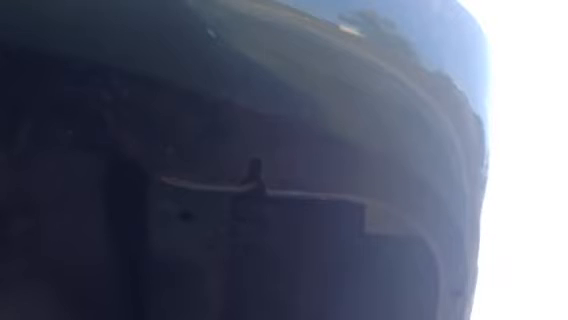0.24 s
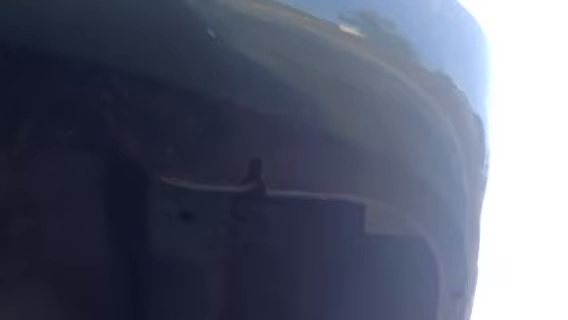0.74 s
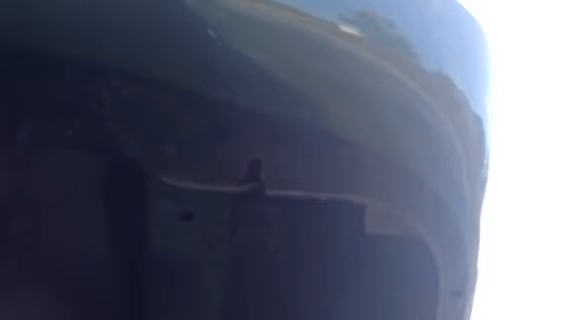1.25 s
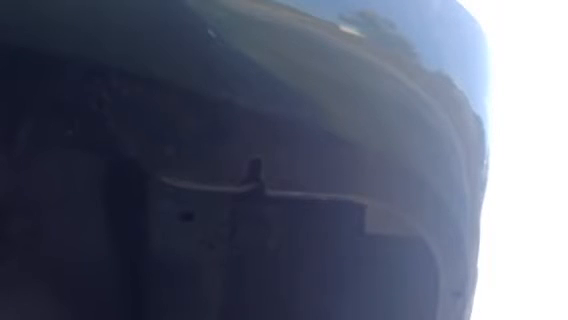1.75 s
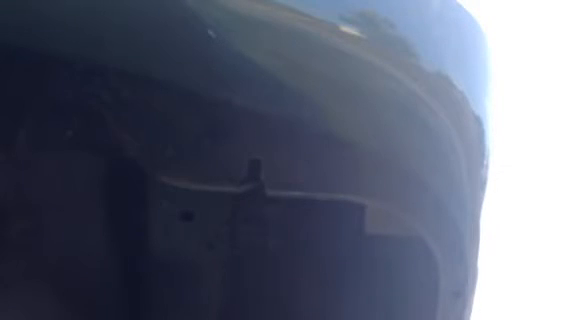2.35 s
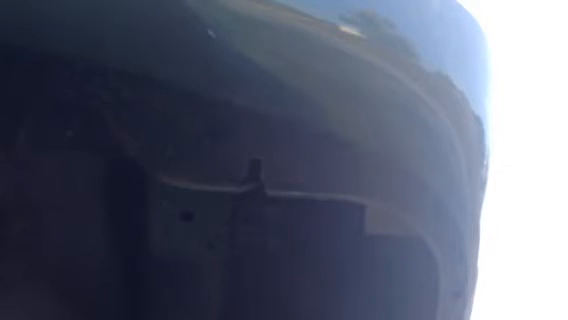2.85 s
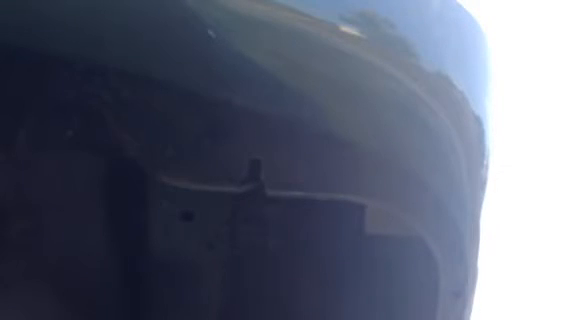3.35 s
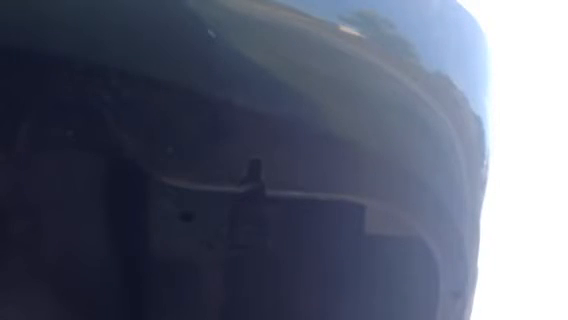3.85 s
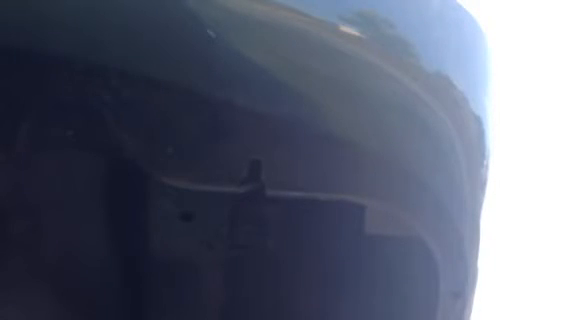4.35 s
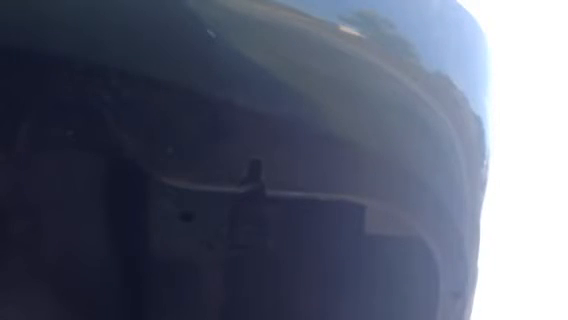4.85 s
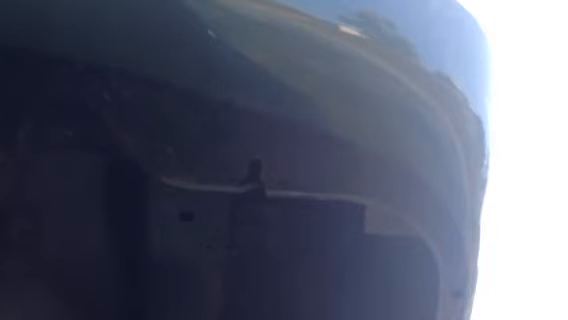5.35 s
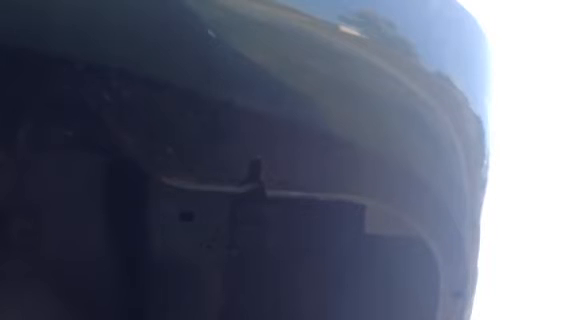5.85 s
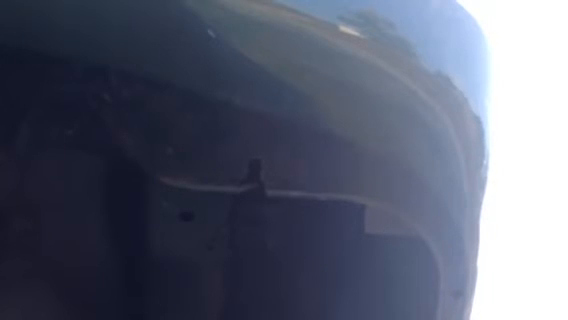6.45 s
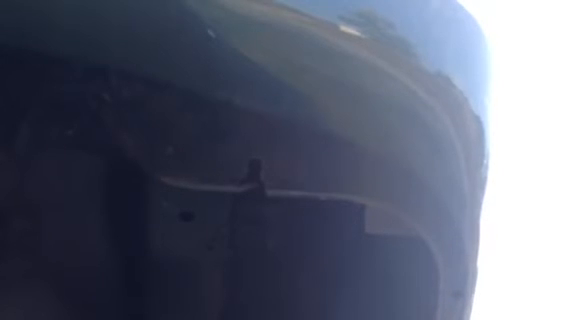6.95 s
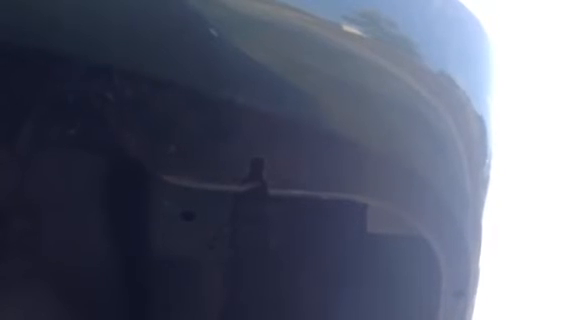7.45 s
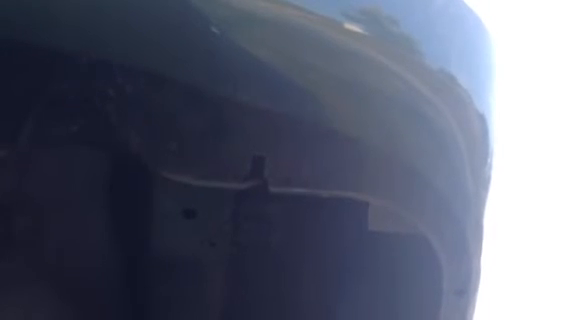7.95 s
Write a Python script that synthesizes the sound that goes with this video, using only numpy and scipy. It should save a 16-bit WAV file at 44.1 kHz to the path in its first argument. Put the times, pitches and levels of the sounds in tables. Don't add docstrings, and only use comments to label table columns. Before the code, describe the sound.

Close, dry and mono, outdoors at the tailpipe of a four-cylinder car without a muffler. At 0 s the engine is already running at about 45 firings per second, dropping by 1.1 s to a quieter, lumpy 26-per-second idle with metallic valve clatter. At 1.8 s the throttle snaps open: a rapid string of harsh cracks, then a raspy roar peaking near 2.2 s at about 79. It falls with deep bangs around 2.3-2.9 s, burbling down to idle by 3.7 s. At 3.9 s a second, louder rev crackles up to about 100 by 4.35 s, then descends as a hollow drone with pops near 4.7 s. It slows through 6 s, sputters at 6.45 s, and from 6.8 s dies in separate slowing chugs and bared clatter until about 7.3 s. Small metal ticks and one last knock near 7.9 s follow, over faint rumble and a high throbbing insect.

```python
import sys
import numpy as np
from scipy import signal
from scipy.fft import rfft, irfft, next_fast_len
from scipy.io import wavfile
from scipy.ndimage import uniform_filter1d

SR = 44100
rng = np.random.default_rng(int(sys.argv[2]) if len(sys.argv) > 2 else 0)


def attenuation_scalar(level_db):
    decades = np.asarray(level_db, float) / 20
    return 10 ** decades


def waveform_to_disk(signal):
    frames = np.transpose(np.atleast_2d(signal))
    scaled = np.clip(frames, -1, 1) * 32767
    samples = np.round(scaled).astype(np.int16)
    wavfile.write(sys.argv[1], SR, samples)


N = 361179
TIME = np.arange(N) / SR
SIZE = next_fast_len(N)
FIRST_PHASE, STALL_S = .298, 6.79

# [f/Hz, level/dB per Hz]
YARD_SPECTRUM = [(20, -30), (57, -5.5), (88, 4), (170, -2.5), (287, -14), (453, -14.5), (961, -24.5),
                 (3130, -31.5), (7000, -29), (15300, -37.5)]
# [f/Hz, width/Hz, level/dB]
PANEL_RINGS = [(2380, 45, -70), (4040, 40, -72), (3560, 120, -76)]
# [t/s, level/dB, f/Hz]
COOLING_TICKS = [(7.3194, -38, 1530), (7.3482, -38.5, 1080), (7.376, -41.5, 4400), (7.4987, -44, 1210),
                 (7.5744, -41, 1850), (7.645, -46, 2340), (7.7894, -53, 1341), (7.8294, -50, 3880),
                 (7.862, -47.5, 4060), (7.888, -54, 2080), (8.055, -46, 1320)]
# [f/Hz, level/dB per Hz]
CLATTER_SPECTRUM = [(260, -9.5), (450, -3.5), (529, -26), (732, -11), (899, -21), (1070, -12.5),
                    (1460, -10.5), (1600, -13), (2110, -12.5), (3010, -16), (5670, -21), (6580, -25.5),
                    (8080, -28.5), (15200, -45)]
# [f/Hz, width/Hz, level/dB]
COVER_MODES = [(760, 32, 3), (900, 31, 3.5), (1349, 7.8, 4.5), (1580, 41, 2), (2100, 12, 1),
               (2780, 14, 3.5), (3190, 14, -3)]
# [f/Hz, width/Hz, level/dB, place in the cycle 0-1]
TAPPETS = [(5740, 36, -69.5, 0), (2755, 23, -67, 0.2), (3100, 37, -69.5, 0.4), (1510, 100, -83, 1)]
# [t/s, level/dB]
RUN_DOWN_LEVEL = [
    (6.7, 0),
    (7.0, 9.5),
    (7.12, 0.5),
    (7.5, -10),
    (7.7, -20),
    (7.88, -8),
    (7.92, -44),
]
# [t/s, depth/dB, recovery/s]
GAIN_DIPS = [
    (2.08, -7.5, 0.34),
    (2.52, -5.5, 0.89),
    (4.3, -4.5, 0.37),
    (4.76, -3.5, 0.31),
]
# [t/s, firings per s]
CRANK_SPEED = [(0, 45.29), (.302, 41.24), (1.149, 26.39), (1.746, 26.52), (1.845, 32.28), (2.174, 79.2),
               (2.484, 66.87), (2.786, 57.86), (3.095, 45.29), (3.705, 30.18), (3.9, 27.28), (4.043, 42.54),
               (4.348, 99.77), (4.723, 88.32), (5.138, 70.71), (5.932, 40.31), (6.364, 37.58), (7.0, 18.63)]
# [pedal down t/s, pedal up t/s, pipe starts to cool t/s, pipe cool t/s]
THROTTLE_STABS = [
    (1.759, 2.021, 2.17, 2.3),
    (3.885, 4.232, 4.33, 4.42),
]
# [t/s, share of full throttle]
IDLE_AIR = [
    (0, 0.091),
    (.8, 0.02),
    (5.9, 0.011),
    (6.4, 0.15),
    (6.8, 0.39),
]
# [start t/s, end t/s, extra unevenness/dB]
ROUGH_SPELLS = [
    (2.22, 2.55, 2.6),
    (2.78, 2.9, 2.3),
    (4.45, 4.76, .9),
]
# [t/s, level/dB]
TAILPIPE_LEVEL = [(0, -15.5), (.52, -17), (.95, -23), (1.76, -24), (1.795, -11.5), (2.44, -9.5),
                  (2.7, -16.5), (3.11, -13), (3.48, -20), (3.89, -18.5), (3.925, -11), (4.7, -7),
                  (5.3, -11), (5.92, -10.5), (6.35, -16), (6.58, -12), (7.08, -19.5), (7.45, -46)]
# [t/s, change/dB, fall/s, recovery/s]
NOTE_DIPS = [
    (1.791, 6, .02, 0.04),
    (2.21, -4, .15, 0.2),
    (2.51, -10.5, 0.04, 0.098),
    (2.86, -5, 0.071, 0.19),
    (4.41, -9, 0.1, 0.076),
    (5.45, -3, 0.23, 0.41),
    (5.98, -1, .03, 0.12),
    (6.78, -5.5, .1, 0.02),
    (7.16, -8.5, 0.058, 0.072),
]
# [t/s, crack/dB, brightness/dB, thump/dB]
BANGS = [(1.82, -19, -15.5, -34), (1.849, -13, -8, -39), (1.879, -17, -9.5, -20), (1.904, -16, -11.5, -19),
         (1.928, -27, -16, -29), (1.949, -18.5, -6, -14.5), (1.971, -16, -11, -36),
         (2.127, -25.5, -11, -27), (2.178, -28, -17, -26), (2.314, -18, -11.5, -14),
         (2.335, -19, -15.5, -4.5), (2.473, -18, -17, 2), (2.776, -27, -24.5, 1), (2.798, -38, -9, -14),
         (2.84, -42, -16, -3), (2.92, -38.5, -11.5, -18), (3.932, -20, -13.5, -20), (3.959, -12, -8, -12),
         (3.988, -13, -10.5, -19), (4.011, -16.5, -7.5, -22), (4.037, -23, -7, -36),
         (4.059, -18.5, -6.5, -15), (4.081, -25, -4, -17), (4.102, -18.5, -11, -29),
         (4.686, -23.5, -22, -10), (4.721, -21, -22, -19.5), (6.445, -31.5, -5, -18),
         (6.474, -32.5, -1.5, -14), (6.531, -39, 0, -33)]
# [t/s, crack/dB, brightness/dB, thump/dB]
LAST_STROKES = [(6.811, -22, -10, -0.75), (6.852, -20.5, -10.5, -0.83), (6.895, -13.5, -12, -1.2),
                (6.943, -20.5, -7, -1.5), (6.991, -13, -11.5, -1.3), (7.042, -15.5, -10, -3.4),
                (7.1, -20, -9, -1.3), (7.133, -51, 0, -0.7), (7.171, -35, -15, -1.8),
                (7.213, -57, -9, -0.43), (7.322, -54, -1, -2.6)]
# [f/Hz, level/dB per Hz]
RASP_SPECTRUM = [(250, -22.5), (430, -0.5), (487, 1), (570, -5.5), (772, 0.5), (857, -7), (1050, -9),
                 (1500, -19), (1950, -45.5), (3300, -120)]
# [f/Hz, level/dB per Hz]
CRACKLE_SPECTRUM = [(650, -29.5), (1100, -2), (1430, -7), (1620, -1.5), (1760, -7), (2040, -1.5),
                    (2200, -6), (2830, -8), (4070, -19), (5720, -19.5), (13900, -35.5), (15200, -41)]
# [f/Hz, width/Hz, level/dB]
BODY_MODES = [(63.6, 12.8, -3.5), (255.3, 12, -19), (339.6, 29, -26.5)]


def unit(x):
    return x / np.sqrt(np.mean(x ** 2))


def columns(table):
    s, *rest = np.transpose(table)
    return [np.interp(TIME, s, c) for c in rest]


def excursion(s, fall_s, change_db, back_s):
    return np.interp(TIME, [s - fall_s, s, s + back_s], [0, change_db, 0])


def ring(x, hz, width):
    return signal.lfilter(*signal.iirpeak(hz, hz / width, fs=SR), x)


def hiss(spectrum):
    hz, db = np.transpose(spectrum)
    f = np.arange(SIZE // 2 + 1) * SR / SIZE + 1
    gain = attenuation_scalar(np.interp(np.log(f), np.log(hz), db, -90, -90))
    return unit(irfft(rfft(rng.standard_normal(SIZE)) * gain, SIZE)[:N])


def clicks(s, size):
    return np.bincount(np.clip((np.asarray(s) * SR).astype(int), 0, N - 1), size, N)


def burst(x, ms):
    return uniform_filter1d(signal.lfilter([1], [1, -np.exp(-1000 / (ms * SR))], x), size=170)


def steady(x, s=0.038):
    k = int(s * SR)
    return x / np.sqrt(uniform_filter1d(uniform_filter1d(x ** 2, k), k) + 1e-12)


def walk(rate):
    k = int(SR / rate)
    return 1.3 * uniform_filter1d(np.repeat(rng.standard_normal(N // k + 1), k), k)[:N]


def firing_rate(turn):
    return np.gradient(turn) * SR


def pedal():
    press_s, gas_dies_db_per_s = .035, 218
    heat = sum(np.interp(TIME, [down, down + press_s, cooling, cool], [0, 1, 1, 0])
               for down, up, cooling, cool in THROTTLE_STABS)
    flow = sum((TIME > down) * attenuation_scalar(-gas_dies_db_per_s * np.clip(TIME - up, 0, 1))
               for down, up, cooling, cool in THROTTLE_STABS)
    valve = np.clip(columns(IDLE_AIR)[0], 0, 1)
    return np.clip(heat + valve, 0, 1), np.minimum(heat, flow) + valve


def loudness():
    (db,) = columns(TAILPIPE_LEVEL + [(7.58, -71)])
    return db + sum(excursion(s, fall, change, back) for s, change, fall, back in NOTE_DIPS)


def law(turn, loud_db, flow, at_50_db, per_octave_db, swing_share, throttle_db):
    octaves = np.log2(firing_rate(turn) / 50)
    return at_50_db + per_octave_db * octaves + swing_share * (loud_db + 14) + throttle_db * flow


def unevenness(turn):
    db = np.interp(firing_rate(turn), [30, 46], [3.0, .8])
    for start, end, extra in ROUGH_SPELLS:
        db = db + np.interp(TIME, [start, start + .07, end - .05, end], [0, extra, extra, 0])
    evened = np.clip(6.0 * pedal()[0], 0, .9)
    return 1.5 * evened + (1 - evened) * db


def ducking():
    return sum(excursion(s, 0.074, depth, back) for s, depth, back in GAIN_DIPS)


def yard():
    insect_hz, throbs_per_s = 7915, 30.9
    throb = np.exp(3.0 * (np.cos(2 * np.pi * (throbs_per_s * TIME + .36)) - 1))
    tone = np.sin(2 * np.pi * insect_hz * TIME)
    rough = unit(ring(rng.standard_normal(N), insect_hz, 200.))
    insect = unit(throb * (tone + .5 * rough))
    air = attenuation_scalar(-55.5 + 1.2 * walk(6)) * hiss(YARD_SPECTRUM)
    return air + attenuation_scalar(-74 + 1.5 * walk(3)) * insect


def bodywork():
    fade = np.interp(TIME, [7.3, 7.4, 7.55, 7.8], [0, 1, .7, 0])
    out = 0
    for hz, width, db in PANEL_RINGS:
        out = out + attenuation_scalar(db + 2 * walk(12)) * unit(ring(rng.standard_normal(N), hz, width)) * fade
    for s, db, hz in COOLING_TICKS:
        shake = burst(clicks([s], [attenuation_scalar(db - 5.5)]), 23.0) * rng.standard_normal(N)
        out = out + 2.6 * ring(shake, hz, 300.) + .25 * ring(shake, 3500., 6000.)
    return out


def valve_gear(turn):
    db = law(turn, 0, pedal()[1], at_50_db=-40.5, per_octave_db=4, swing_share=0, throttle_db=-4)
    db = db + ducking() + columns(RUN_DOWN_LEVEL)[0]
    db = db + sum(excursion(down, 0.075, 2.5, 0.075) for down, *_ in THROTTLE_STABS)
    impacts = attenuation_scalar(3.0 * rng.standard_normal(N)) * (rng.random(N) < 300 / SR)
    grains = 4.5 + burst(impacts, 3.5)
    out = hiss(CLATTER_SPECTRUM) * unit(grains) * attenuation_scalar(.6 * walk(14))
    out = out + sum((attenuation_scalar(peak_db) - 1) * ring(out, hz, width) for hz, width, peak_db in COVER_MODES)
    cycles = turn / 4
    for hz, width, ping_db, place in TAPPETS:
        s = np.interp(np.arange(place, cycles[int(STALL_S * SR)]), cycles, TIME)
        taps = clicks(s, attenuation_scalar(3.1 * rng.standard_normal(len(s))))
        out = out + attenuation_scalar(ping_db + 45.0) * unit(ring(ring(taps, hz, 3 * width), hz, width))
    return attenuation_scalar(db - 4.0) * out


def burble(firing_s, bang_s, bang_db):
    hz, width = 335, 80
    stirs = np.r_[firing_s, bang_s]
    stirred = 0.73 + burst(clicks(stirs, np.ones(len(stirs))), 9.6)
    eddies = rng.standard_normal(N) * stirred * attenuation_scalar(0.55 * walk(30))
    gurgle = steady(ring(ring(eddies, hz, width), hz, 2.06 * width), 0.089)
    return gurgle * (1 + attenuation_scalar(15.5) * burst(clicks(bang_s, attenuation_scalar(bang_db)), 18))


def cracks(s, crack_db, bright_db):
    dull, bright = clicks(s, attenuation_scalar(crack_db)), clicks(s, attenuation_scalar(crack_db + bright_db))
    dull_burst = burst(dull, 4.9) + 0.16 * burst(dull, 21.0)
    bright_burst = burst(bright, 7.5) + 0.097 * burst(bright, 22.)
    return dull_burst * hiss(RASP_SPECTRUM) + bright_burst * hiss(CRACKLE_SPECTRUM)


def pipe(x, order, slug_ms, trip_ms, echo, loss_hz):
    f = np.arange(SIZE // 2 + 1) * SR / SIZE
    w = 2j * np.pi * f / 1000
    slug = (w * slug_ms) ** order * np.exp((w * slug_ms) ** 2 / 2)
    echoes = 1 - np.clip(echo, 0, .8) * np.exp(-w * trip_ms - (f / loss_hz) ** 2)
    return irfft(rfft(x, SIZE) * slug / echoes, SIZE)[:N]


def pipe_note(blows, throttle, turn):
    slow = np.clip((38 - firing_rate(turn)) / 8, 0, 1)
    cool = pipe(blows * (1 - throttle) * (1 - slow), 1, slug_ms=1.478, trip_ms=11.81, echo=0.96, loss_hz=180)
    idle = pipe(blows * (1 - throttle) * slow, 1, slug_ms=1.65, trip_ms=11.4, echo=.3, loss_hz=500)
    hot = pipe(blows * throttle, 2, slug_ms=1.766, trip_ms=10.24, echo=0.24, loss_hz=460)
    return cool - 0.51 * ring(cool, 209, 82) + idle + hot


def body_modes(blows):
    soft = uniform_filter1d(uniform_filter1d(blows, size=60), size=60)
    return sum(attenuation_scalar(db) * ring(ring(soft, hz, 2.0 * width), hz, width) for hz, width, db in BODY_MODES)


def exhaust(turn):
    throttle, flow = pedal()
    size_db, thump_db = unevenness(turn), loudness()
    rasp_db = law(turn, thump_db, flow, at_50_db=-44.5, per_octave_db=11.5, swing_share=0.7, throttle_db=10.5)
    rasp_db = rasp_db + .6 * ducking()
    crackle_db = law(turn, thump_db, flow, at_50_db=-35.5, per_octave_db=10.5, swing_share=0, throttle_db=-1)
    burble_db = law(turn, thump_db, flow, at_50_db=-37.5, per_octave_db=1.5, swing_share=0.4, throttle_db=0)
    burble_db = burble_db + 3.5 * throttle - 8 * (TIME > 7.14)

    stroke_no = np.arange(1, turn[int(STALL_S * SR)])
    s = np.interp(stroke_no, turn, TIME)
    i = (s * SR).astype(int)
    lateness, strength, puff = rng.standard_normal((len(s), 3)).T
    late_ms = .33 * size_db[i]
    s = s + late_ms * lateness / 2000 - .004 * throttle[i]
    bang, stroke = np.transpose(BANGS), np.transpose(LAST_STROKES)
    size = attenuation_scalar(size_db[i] * (.7 * strength + (-1) ** stroke_no))
    blows = clicks(s, size) + clicks(stroke[0] + 0.0041, attenuation_scalar(stroke[3])) + clicks(bang[0], attenuation_scalar(bang[3]))
    blows = blows + attenuation_scalar(-48.5 + 3 * walk(25)) * rng.standard_normal(N)
    thump = pipe_note(blows, throttle, turn) - body_modes(blows)
    thump = attenuation_scalar(thump_db) * steady(thump, 0.14)

    puffs = .6 + burst(clicks(s + .003, attenuation_scalar(3.0 * puff)), 5.5)
    gas = attenuation_scalar(rasp_db - 8 + 2.4 * throttle) * hiss(RASP_SPECTRUM)
    gas = gas + flow * attenuation_scalar(crackle_db - 1.5) * hiss(CRACKLE_SPECTRUM)
    gas = gas * steady(puffs) * (TIME < STALL_S)

    at, crack_db, bright_db, _ = np.c_[bang, stroke]
    crack = attenuation_scalar(-3.5) * cracks(at, crack_db, bright_db)
    gurgle = attenuation_scalar(burble_db - 2.0) * burble(s, at, np.r_[bang[3], stroke[1] + 10.])
    return thump + gurgle + gas + crack


def scene():
    k = int(.1 * SR)
    speed = uniform_filter1d(columns(CRANK_SPEED)[0], k, mode="nearest")
    speed = uniform_filter1d(speed, k, mode="nearest")
    turn = FIRST_PHASE + np.cumsum(speed) / SR
    return (exhaust(turn) + valve_gear(turn) + bodywork() + yard())[None]


def roll_off(x):
    return signal.sosfilt(signal.butter(12, 15380, fs=SR, output="sos"), x)


def record(dry):
    x = signal.sosfiltfilt(signal.butter(2, 42, "high", fs=SR, output="sos"), dry)
    shake = uniform_filter1d(np.abs(x), size=8000) * unit(ring(rng.standard_normal(N), 22., 22.0))
    x = x + attenuation_scalar(-23.5) * signal.sosfilt(signal.butter(2, 40, fs=SR, output="sos"), shake)
    mix = x / (1 + (np.abs(x) / .71) ** 8) ** (1 / 8)
    return roll_off(mix)


dry = scene()
out = record(dry)
waveform_to_disk(out)
```